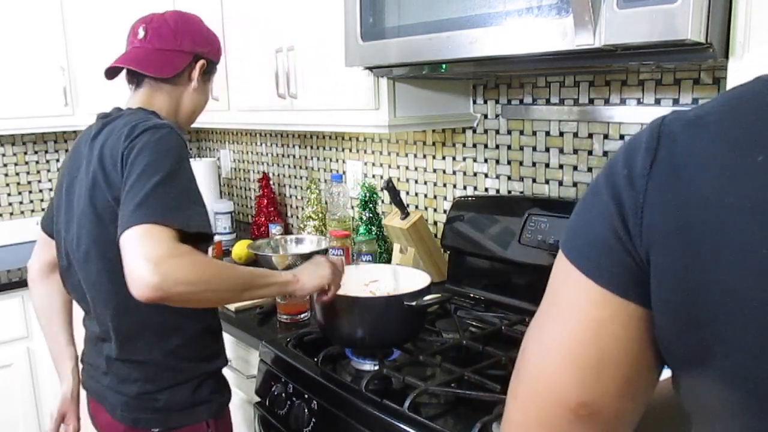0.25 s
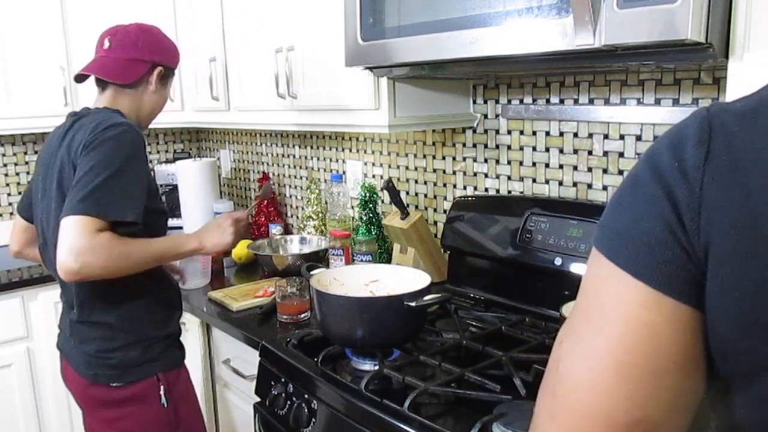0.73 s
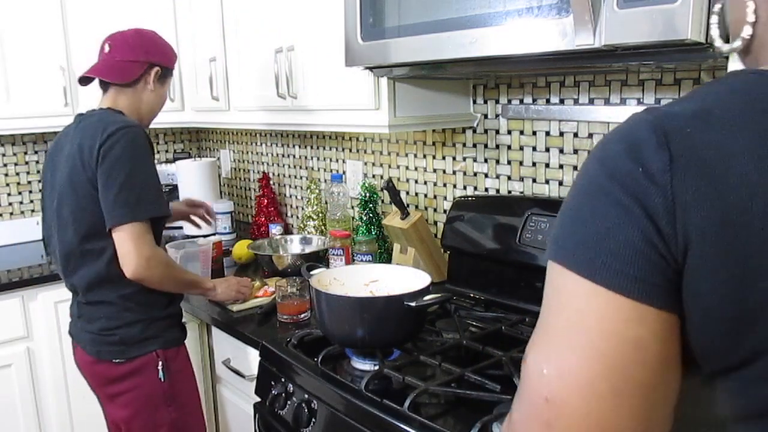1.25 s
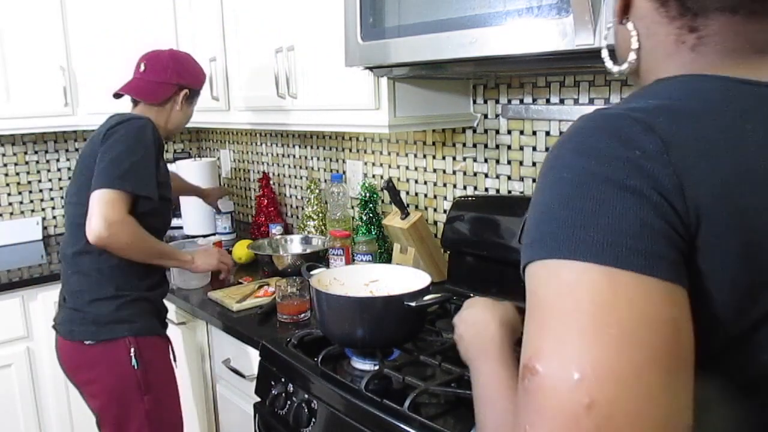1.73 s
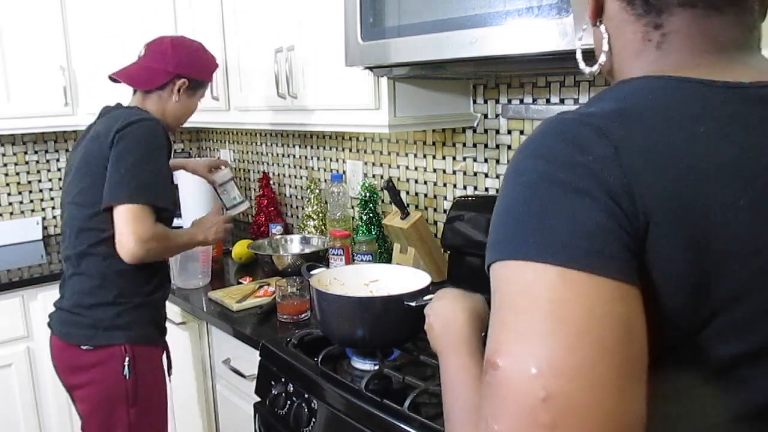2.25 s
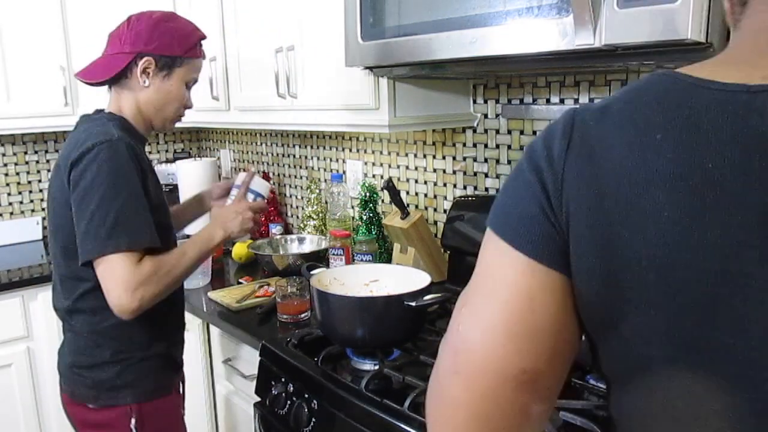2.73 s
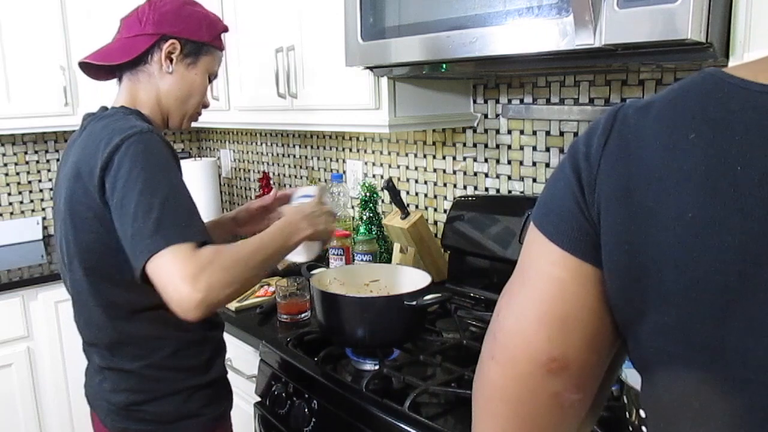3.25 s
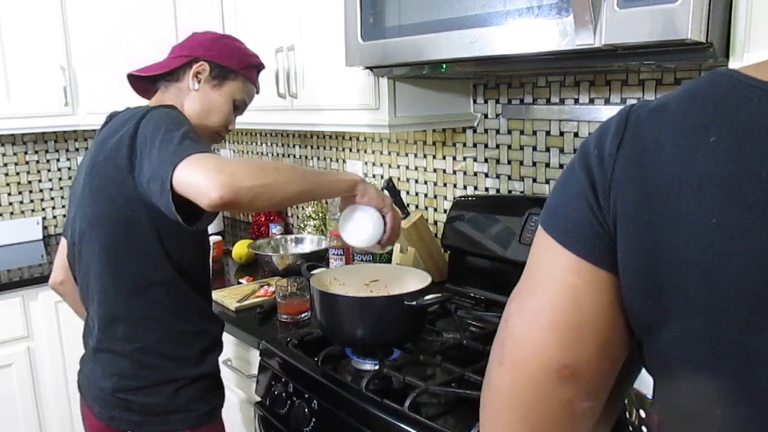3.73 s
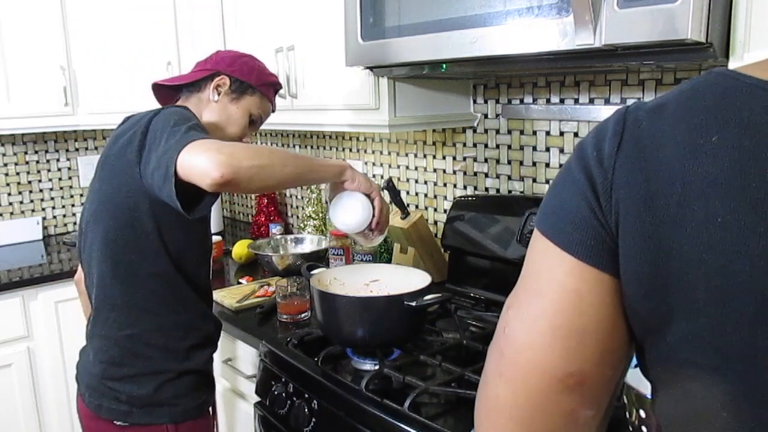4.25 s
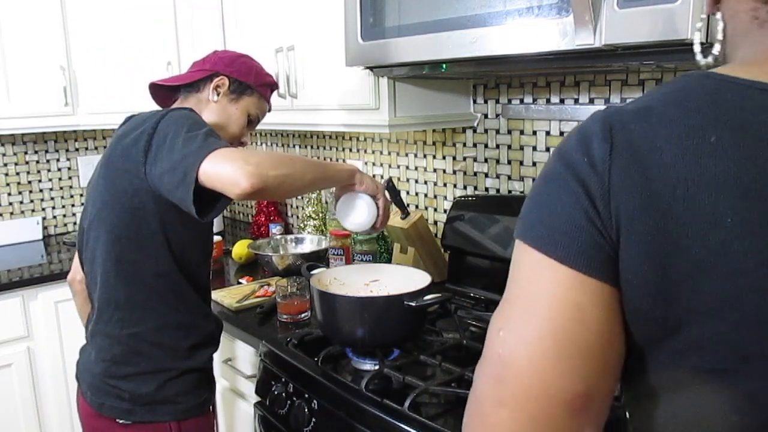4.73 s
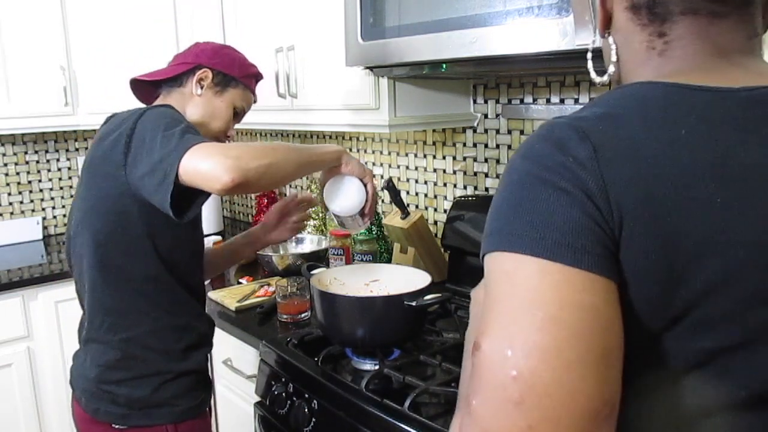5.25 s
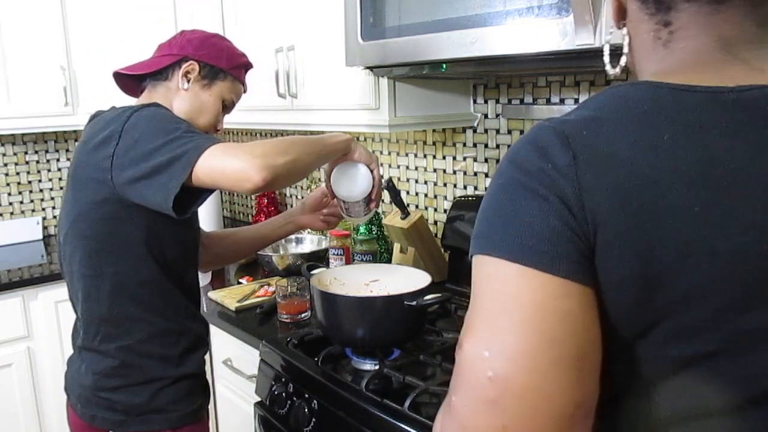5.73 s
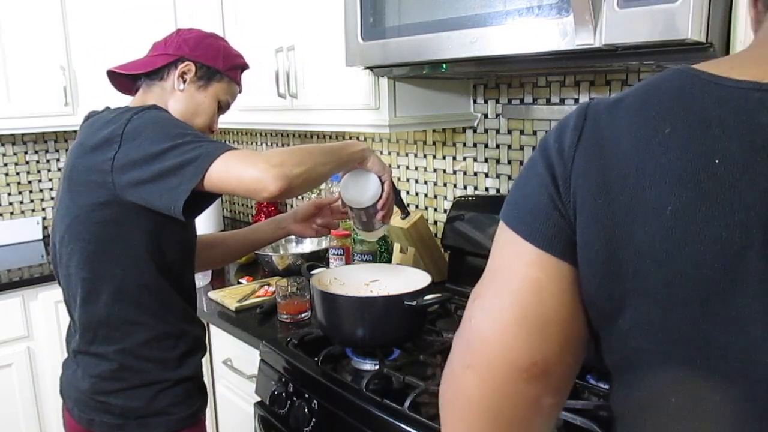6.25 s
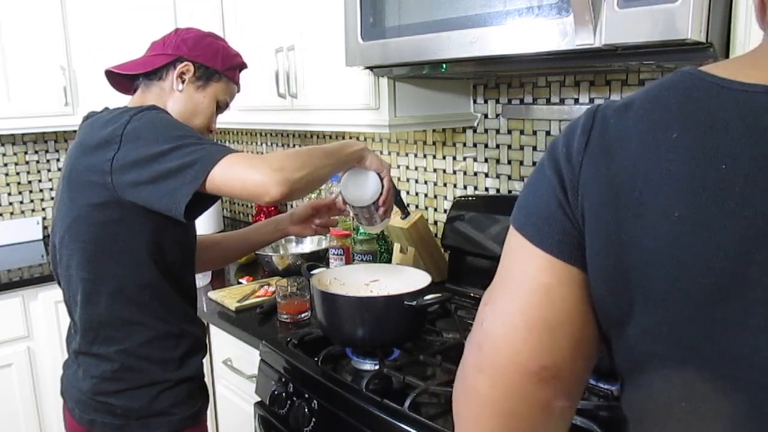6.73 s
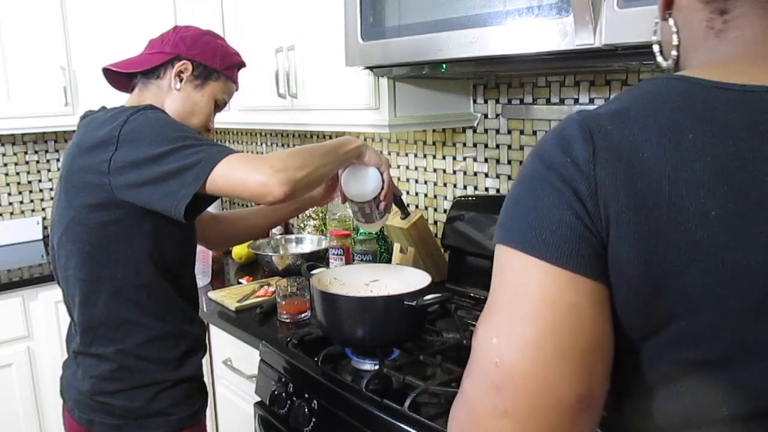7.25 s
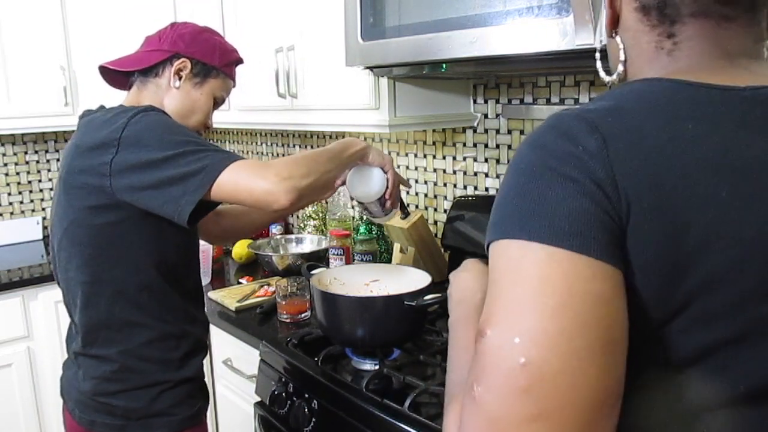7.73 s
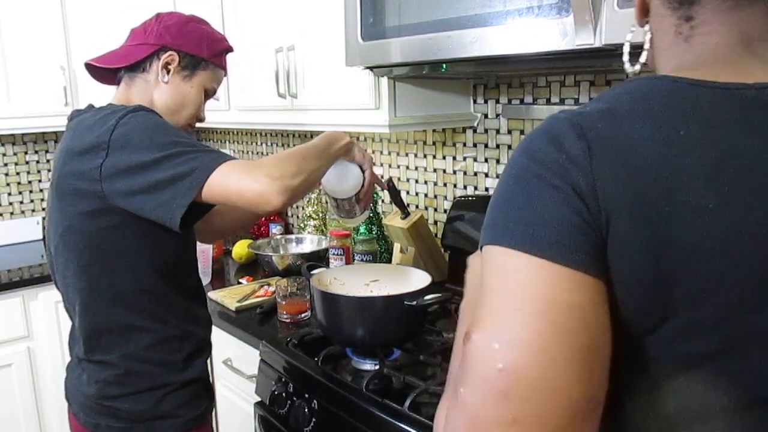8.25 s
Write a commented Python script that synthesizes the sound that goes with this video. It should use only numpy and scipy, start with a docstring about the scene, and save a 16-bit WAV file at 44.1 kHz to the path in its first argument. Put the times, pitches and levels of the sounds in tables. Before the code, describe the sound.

A metal spoon knocks on a pot, then salt hisses from a shaken, patted and tapped canister over a soft gas flame.

```python
"""A metal spoon is knocked clean on the rim of a pot of rice, each impact exciting the metal's modes.
A utensil clatters down on the counter and a salt canister is picked up, rubbing and creaking in the hands.
Salt is shaken over the pot in quick strokes, its many tiny collisions merging into a hiss; the canister
is patted and tapped to loosen it. Underneath, the pot simmers on a softly roaring gas ring,
and the tiled kitchen adds reflections to the knocks and the handling."""
import sys
import numpy as np
from scipy import signal
from scipy.fft import rfft, irfft, next_fast_len
from scipy.io import wavfile

SR = 44100
rng = np.random.default_rng(int(sys.argv[2]) if len(sys.argv) > 2 else 0)


def pcm_store(signal):
    """Save signal as 16-bit PCM."""
    levels = np.round(np.clip(np.atleast_2d(signal), -1, 1) * 32767)
    wavfile.write(sys.argv[1], SR, levels.astype(np.int16).T)


N = 374850
LEAD = SR // 4   # samples of sound before time zero
TIME = np.arange(-LEAD, N) / SR


# Knocks on the rim; the first is already dying away at time zero. Each row: start in seconds,
# level in dB, chatter length in seconds, spot on the rim as a signed position.
RIM_KNOCKS = [(-0.085, -14, 0.0079, -1.2), (0.189, -11.5, .009, -0.83), (0.4655, -12.5, 0.0034, 0.9)]
# Modes of pot and spoon. Each row: nominal frequency and width in Hz, level in dB, dB per unit of spot.
POT_MODES = [(252, 46, -8.5, -2), (363, 31, -11, -1), (454, 37, 0.5, 2), (580, 34, 1, 0.5),
             (736, 79, -5.5, 1.5), (880, 90, -12.5, -3.5), (1110, 70, -9, 2.5), (1760, 180, -15.5, 0),
             (2610, 590, -14.5, 6), (3410, 160, -12.5, -2.5), (4530, 200, -11.5, 3.5), (5070, 90, -9, -3.5),
             (5330, 110, -9.5, -7), (5735, 170, -1, 1), (6000, 200, -12, -3), (6840, 250, -3, 1.5),
             (7450, 210, -7, 6.5), (8690, 260, -7.5, -0.5), (9600, 220, -18.5, 4), (10960, 150, -17.5, 7.5),
             (12250, 290, -14, -2.5), (13660, 360, -16.5, -4)]

def spoon():
    """Modal excitation: the spot struck on the rim decides how strongly each mode speaks."""
    out = np.zeros(len(TIME))
    for s, db, chatter_s, spot in RIM_KNOCKS:
        modes = [(hz, width, level + spot * change) for hz, width, level, change in POT_MODES]
        knock = impact(modes, pitch=0.98, crack_db=-22.5, crack_hz=13000, chatter_s=chatter_s, bass_hz=187)
        add(out, s, from_db(db) * knock)
    return out


# The utensil lands. Each row: start in seconds, level in dB, pitch ratio, low-pass cutoff in Hz.
BOUNCES = [(1.302, -38.5, 1.03, 2140), (1.320, -42, 0.95, 1590), (1.527, -41.5, 0.87, 5000),
           (1.540, -35, 1.3, 5000), (1.552, -29.5, 0.98, 9150), (1.571, -39, 1.04, 8000)]
# Modes of utensil and cutting board. Each row: frequency in Hz, width in Hz, level in dB.
BOARD_MODES = [(503, 150, -2.5), (1090, 140, 4.5), (1370, 170, 0), (1700, 300, -6), (2200, 210, -1.5),
               (2940, 440, 1.5), (3440, 400, -3), (5140, 1300, -3.5)]
# Modes of the utensil's metal. Each row: frequency in Hz, width in Hz, level in dB.
CLINK_MODES = [(4600, 20, 4), (5400, 24, -8), (7070, 43, 4.5), (10000, 40, -10), (11060, 45, -10),
               (13450, 60, -15)]

def utensil(clink_db=-37):
    """A soft contact acts as a low-pass filter; only the hardest touch sets the metal clinking."""
    out = np.zeros(len(TIME))
    for s, db, pitch, cutoff_hz in BOUNCES:
        touch = impact(BOARD_MODES, pitch, crack_db=-9.5, crack_hz=4030, chatter_s=0.0092)
        softness = signal.butter(2, cutoff_hz, fs=SR)
        add(out, s, from_db(db) * signal.lfilter(*softness, touch))
    hardest_s = max(BOUNCES, key=lambda row: row[1])[0]
    clink = impact(CLINK_MODES, pitch=1, crack_db=-31, crack_hz=9000, chatter_s=0.0022)
    add(out, hardest_s, from_db(clink_db) * clink)
    return out


# Runs of even shakes. Each row: first and last stroke in seconds, number of strokes.
SHAKES = [(3.438, 3.635, 3), (3.743, 5.06, 16), (6.178, 6.26, 2), (6.381, 6.591, 4)]
# Vigour of the wrist. Each row: time in seconds, relative level in dB.
WRIST_EFFORT = [(3.43, -34), (3.56, -29.5), (3.83, -30), (4.1, -34), (4.6, -34), (4.712, -43), (4.8, -35.5),
                (4.89, -32), (5.06, -40.5), (6.177, -33), (6.27, -39), (6.54, -34)]
# Hiss of the salt. Each row: frequency in Hz, spectral density in dB.
SALT_SPECTRUM = [(700, -24), (1900, -15.5), (3500, -9.5), (4500, -3.5), (5300, 0), (6200, 1), (7100, -6),
                 (8500, -5.5), (10000, -9), (12500, -5), (15000, -10.5), (16000, -5.5)]

def salt(level_db=-3, early_s=0.005, fall_s=0.053, half_stroke_share=0.31):
    """Incoherent sources add in power: colliding crystals hiss as they slide after a shake or a tap."""
    # salt jolted up by a tap comes down a moment later
    slides = [(s + fall_s, db, half_s) for s, *_, db, half_s in FINGER_TAPS]
    for first, last, count in SHAKES:
        strokes, period = np.linspace(first, last, round(count), retstep=True)
        slides += [(s, in_time(WRIST_EFFORT, s), half_stroke_share * period) for s in strokes]
    power = 0
    for s, db, half_s in slides:
        offset = (TIME - s + early_s) / half_s
        power = power + from_db(db) ** 2 * np.exp(-np.minimum(offset ** 2, 50))
    # a caked lump gives way between the pats
    power = power + swell(s=5.594, hold_s=0, db=-28.5, attack_s=0.017, fade_db_per_s=133)
    hiss = coloured(grains(per_s=11000, spread_db=3), SALT_SPECTRUM)
    return from_db(level_db) * np.sqrt(power) * hiss


# Palm against the canister. Each row: start in seconds, level in dB, pitch ratio, crack in dB.
PALM_PATS = [(1.908, -36, 1.07, -21.5), (1.921, -41.5, 1.01, -21), (5.427, -28.5, 0.98, -28),
             (5.634, -36, 1.076, -22), (5.811, -33.5, 1.03, -28.5), (6.013, -44.5, 0.93, -14),
             (6.262, -41.5, 1.2, -27)]
# Modes of the whole canister. Each row: frequency in Hz, width in Hz, level in dB.
BODY_MODES = [(109, 64, -8), (258, 42, -8.5), (283, 46, -5.5), (365, 74, -12), (455, 50, 1.5),
              (543, 53, -1.5), (734, 17, 0), (1030, 280, -25), (1360, 170, -17.5)]

def patting():
    """Free vibration: each pat leaves the whole canister ringing in its low modes."""
    return struck(PALM_PATS, BODY_MODES, crack_hz=6800)


# Fingertip on the canister. Each row: start in seconds, level in dB, pitch ratio, crack in dB,
# hollow note in dB, relative level of the salt's slide in dB, half length of that slide in seconds.
FINGER_TAPS = [(7.021, -33.5, 0.98, -12, -41, -36.5, 0.012), (7.230, -39.5, 0.97, -12, -40.5, -40, .021),
               (7.432, -33.5, 1, -14, -44.5, -40, .026), (7.634, -38, 1.02, -11, -54, -36.5, 0.017),
               (7.827, -37.5, 1, -9, -62, -37, .026), (8.041, -38.5, 1.0, -32, -45, -35, 0.052),
               (8.250, -39, 0.97, -13, -40, -38, 0.037), (8.452, -38.5, 0.99, -21, -57, -39, 0.095)]
# Modes of the canister wall. Each row: frequency in Hz, width in Hz, level in dB.
WALL_MODES = [(129, 71, -5), (240, 55, 8), (276, 83, 7), (465, 85, 5), (545, 25, 6.5), (750, 61, -1),
              (1050, 380, -6), (1500, 290, -8.5), (2160, 220, 2), (4950, 950, -4.5)]

def tapping():
    """Cavity resonance: each tap rings the wall, and the air inside answers with a hollow note."""
    out = struck([row[:4] for row in FINGER_TAPS], WALL_MODES, crack_hz=6500)
    for s, _, _, _, hollow_db, _, _ in FINGER_TAPS:
        add(out, s, burst(hollow_db, hz=748, t60_s=0.11, relative_width=0.14))
    return out


# The canister moves in the hands with a faint rustle. Each row: start and end in seconds.
HELD_SPANS = [(2.2, 5.08), (5.44, 8.5)]
# The hands reach and shift their grip. Each row: time in seconds, hold in seconds, level in dB.
GRIP_SHIFTS = [(1.33, 0.034, -57), (1.96, .02, -51), (2.18, 0.081, -45.5), (2.75, .07, -53.5),
               (5.46, 0.29, -50), (8.08, .4, -51)]
# Skin on the canister. Each row: frequency in Hz, spectral density in dB.
RUB_SPECTRUM = [(600, -20), (1000, -14), (1500, 1), (2200, -5.5), (3000, -5), (4500, -5), (6300, -3.5),
                (9700, -9.5), (12000, -6.5), (15500, -13.5)]
# A finger drags. Each row: time in seconds, hold in seconds, level in dB.
FINGER_DRAGS = [(2.073, .03, -54), (2.24, 0.29, -55.5), (5.615, .13, -53.5)]
# Its hoarse squeak. Each row: frequency in Hz, spectral density in dB.
SQUEAK_SPECTRUM = [(1100, -35), (1400, 5), (1550, 2), (1750, -4), (2100, -38)]

def hands(held_db=-53.5):
    """Sliding friction: dense tiny slips of skin make a rustle, sparse ones in a narrow band a squeak."""
    moves = [(start, end - start, held_db) for start, end in HELD_SPANS] + list(GRIP_SHIFTS)
    rub_power = sum(swell(*move, attack_s=0.03, fade_db_per_s=68) for move in moves)
    squeak_power = sum(swell(*drag, attack_s=0.03, fade_db_per_s=200) for drag in FINGER_DRAGS)
    rub = coloured(grains(per_s=5000, spread_db=3.5), RUB_SPECTRUM)
    squeak = coloured(grains(per_s=400, spread_db=3.5), SQUEAK_SPECTRUM)
    return np.sqrt(rub_power) * rub + np.sqrt(squeak_power) * squeak


# Short clicks and creaks of handling, including the fingertip's contact on two taps.
# Each row: start in seconds, level in dB, frequency in Hz, 60 dB decay time in seconds.
HANDLING_TICKS = [(1.338, -51, 10400, .09), (2.186, -48, 2120, 0.2), (2.736, -42.5, 8600, 0.075),
                  (2.753, -40.5, 5500, 0.044), (3.083, -45, 310, .07), (5.775, -42.5, 7800, .06),
                  (6.687, -44.5, 2550, 0.12), (7.216, -38, 2650, 0.076), (7.545, -44, 9000, 0.077),
                  (8.021, -37.5, 8700, 0.046), (8.241, -35.5, 1670, 0.065), (8.365, -41.5, 8160, 0.11)]

def ticks(faint_per_s=1.5, faint_db=-51, faint_hz=6500):
    """Damped resonance: each click or creak is one broad band; faint ones follow the pick-up at random."""
    out = np.zeros(len(TIME))
    for s, db, hz, t60_s in HANDLING_TICKS:
        add(out, s, burst(db, hz, t60_s))
    start_s = HELD_SPANS[0][0]
    span_s = HELD_SPANS[-1][1] - start_s
    for when, height in rng.uniform(size=(round(faint_per_s * span_s), 2)):
        hz = faint_hz * 2 ** (2 * height - 1)   # up to an octave either way
        add(out, start_s + when * span_s, burst(faint_db, hz, t60_s=0.045))
    return out


# Gas flame and simmering pot. Each row: frequency in Hz, spectral density in dB.
STOVE_SPECTRUM = [(15, -36), (25, -7.5), (116, -7), (227, -6), (297, -7), (614, -6.5), (703, -4), (997, -5),
                  (1620, -15), (1900, -20.5), (2300, -13), (2850, -16.5), (6380, -14), (9810, -21),
                  (15500, -24.5)]
# Level of the stove background as heard: it dips after the loud knocks and recovers,
# as with a recorder's automatic gain. Each row: time in seconds, level in dB.
BACKGROUND_GAIN = [(0, -45.5), (1.0, -55), (1.8, -52), (3.0, -51), (5.2, -51), (8.5, -49.5)]

def stove(simmer_db=-17, hum_hz=60, hum_db=-71.5):
    """Superposition of the flame's broadband roar, the pot's fine pops and a faint mains hum."""
    flame = coloured(diffuse(len(TIME)), STOVE_SPECTRUM)
    pop_spectrum = [(500, -26), (1500, 4), (6000, -5), (14000, -24)]   # Hz, dB
    pops = coloured(grains(per_s=150, spread_db=4.5), pop_spectrum)
    hum = from_db(hum_db) * rms_one(np.sin(2 * np.pi * hum_hz * TIME))
    return from_db(in_time(BACKGROUND_GAIN, TIME)) * (flame + from_db(simmer_db) * pops) + hum


# The tiled kitchen. Each row: frequency in Hz, 60 dB decay time in seconds.
REVERB_TIMES = [(150, 0.64), (500, 0.48), (2000, 0.65), (5500, 0.45), (8000, 0.49), (14000, 0.29)]

def kitchen(x, direct_db, early_db, late_db):
    """Reverberation: direct sound, early reflections from hob and tiles, then an exponential tail."""
    t = np.arange(SR * 2 // 3) / SR
    centres = np.geomspace(125, 16000, 8)
    noise, late = diffuse(len(t)), 0
    for hz, share in zip(centres, np.eye(len(centres))):
        band = filtered(noise, lambda f: at_hz(np.c_[centres, share], f))
        late = late + band * decay(t, at_hz(REVERB_TIMES, hz))
    late = late * (1 - np.exp(-t / 0.0094))   # the tail builds up
    early = diffuse(len(t)) * decay(t, t60_s=0.11) * (t > 0.001)
    response = (from_db(early_db) * rms_one(early) + from_db(late_db) * rms_one(late)) / np.sqrt(len(t))
    response[:, 0] += from_db(direct_db)
    return signal.fftconvolve(x[None], response, axes=1)[:, :len(x)]


# Likeness of left and right. Each row: frequency in Hz, correlation (negative values count as zero).
COHERENCE = [(50, 0), (130, 0), (300, 0.43), (600, 0.64), (1200, 0.23), (3000, 0.2), (6000, -0.19),
             (12000, -0.5)]

def diffuse(size):
    """Diffuse field: white stereo noise, partly coherent in the midrange, unrelated at the extremes."""
    mid, side = rng.standard_normal((2, size))
    mid = filtered(mid, lambda hz: np.sqrt(1 + np.clip(at_hz(COHERENCE, hz), 0, 1)))
    side = filtered(side, lambda hz: np.sqrt(1 - np.clip(at_hz(COHERENCE, hz), 0, 1)))
    return rms_one(np.array([mid + side, mid - side]))


def impact(modes, pitch, crack_db, crack_hz, chatter_s, bass_hz=130):
    """Impulse response: damped modes over the contact's broad crack, with the energy of 10 ms at rms 1."""
    size = SR // 5
    hz = np.fft.rfftfreq(size, 1 / SR) + 1
    power = from_db(crack_db) ** 2 / (1 + (hz / crack_hz) ** 2)
    for centre, width, db in modes:
        detuning = hz / (centre * pitch) - centre * pitch / hz
        power = power + from_db(db) ** 2 / (1 + (detuning * centre / width) ** 2)
    power = power / (1 + (bass_hz / hz) ** 4)   # small things radiate little bass
    cepstrum = irfft(np.log(power), size)
    cepstrum[size // 2:] = 0   # minimum phase: every resonance starts at the contact and dies away
    # while the contact chatters, each part of the spectrum is set off at its own moment
    delay_s = np.interp(hz, np.linspace(0, SR / 2, 60), chatter_s * rng.random(60) ** 2)
    phase_lag = 2 * np.pi * np.cumsum(delay_s) * SR / size
    sound = irfft(np.exp(rfft(cepstrum) - 1j * phase_lag), size)[:size // 2]
    return sound * np.sqrt(SR // 100 / np.sum(sound ** 2))


def struck(events, modes, crack_hz, chatter_s=0.006, vary_db=1.5):
    """Mode levels vary from blow to blow, since no two land on quite the same spot."""
    out = np.zeros(len(TIME))
    for s, db, pitch, crack_db in events:
        touched = [(hz, width, level + vary_db * rng.standard_normal()) for hz, width, level in modes]
        add(out, s, from_db(db) * impact(touched, pitch, crack_db, crack_hz, chatter_s))
    return out


def burst(db, hz, t60_s, relative_width=0.31):
    """Damped resonance: a band of noise that dies away."""
    t = np.arange(SR // 4) / SR
    resonance = signal.iirpeak(hz, 1 / relative_width, fs=SR)
    noise = rng.standard_normal(len(t))
    band = signal.lfilter(*resonance, signal.lfilter(*resonance, noise))
    return from_db(db) * rms_one(band) * decay(t, t60_s)


def grains(per_s, spread_db):
    """Shot noise: tiny impacts of uneven size at random times."""
    size = len(TIME)
    strengths = from_db(spread_db * np.minimum(rng.exponential(1, size), 4))
    signs = rng.choice([-1, 1], size)
    return strengths * signs * (rng.random(size) < per_s / SR)


def swell(s, hold_s, db, attack_s, fade_db_per_s):
    """Power envelope that reaches its level at time s, holds, then fades."""
    rise = np.clip((TIME - s) / attack_s + 1, 0, 1)
    fade_db = np.clip(fade_db_per_s * (TIME - s - hold_s), 0, 100)
    return (rise * from_db(db - fade_db)) ** 2


def decay(t, t60_s):
    """Exponential damping, 60 dB in t60_s."""
    return np.exp(-np.log(1000) * t / t60_s)


def from_db(db):
    """Decibels to amplitude ratio."""
    return 10 ** (np.asarray(db) / 20)


def rms_one(x):
    """Normalisation to rms 1."""
    return x / np.sqrt(np.mean(x ** 2) + 1e-20)


def in_time(points, s):
    """Linear interpolation in time."""
    return np.interp(s, *np.transpose(points))


def at_hz(points, hz):
    """Interpolation on a log-frequency axis."""
    freqs, values = np.transpose(points)
    return np.interp(np.log(np.maximum(hz, 1)), np.log(freqs), values)


def filtered(x, gain_at):
    """Zero-phase filtering by a gain that depends on frequency."""
    size = next_fast_len(x.shape[-1] + SR // 20)
    gain = gain_at(np.fft.rfftfreq(size, 1 / SR))
    return irfft(rfft(x, size) * gain, size)[..., :x.shape[-1]]


def coloured(x, spectrum):
    """Spectral shaping, scaled to rms 1."""
    return rms_one(filtered(x, lambda hz: from_db(at_hz(spectrum, hz))))


def add(track, s, sound):
    """Superposition of a sound on a track at time s."""
    start = max(round(s * SR) + LEAD, 0)
    track[start:start + len(sound)] += sound[:len(track) - start]


def pan(left_db):
    """Level difference as a pair of gains, left and right."""
    return from_db(left_db * np.array([[0.5], [-0.5]]))


def scene():
    """Sound pressures add: the sources at the stove, heard across the kitchen."""
    pats = patting()
    pot = kitchen(spoon(), direct_db=-8, early_db=-3.5, late_db=-5.5) * pan(left_db=0.6)
    counter = kitchen(utensil() + ticks(), direct_db=-4, early_db=-1.5, late_db=-3)
    canister = kitchen(pats + tapping(), direct_db=-2.5, early_db=1, late_db=-3.5)
    seasoning = kitchen(salt() + hands(), direct_db=-5, early_db=-5, late_db=-10)
    return (pot + counter + canister + seasoning + stove())[:, LEAD:]


# Balance of the microphone pair. Each row: frequency in Hz, left minus right in dB.
STEREO_BALANCE = [(60, -0.5), (300, -0.5), (550, -2.5), (1000, -2), (2200, 1.5), (5500, 3.5), (9000, 5),
                  (13000, 7)]
CUTOFF_HZ = 15900

def record(dry):
    """Acoustic shadowing dulls the right port's treble; a steep low-pass cuts the top of both sides."""
    heard = filtered(dry, lambda hz: pan(at_hz(STEREO_BALANCE, hz)))
    low_pass = signal.ellip(10, 0.2, 80, CUTOFF_HZ, fs=SR, output="sos")
    return signal.sosfilt(low_pass, heard)


dry = scene()
out = record(dry)
pcm_store(out)
```